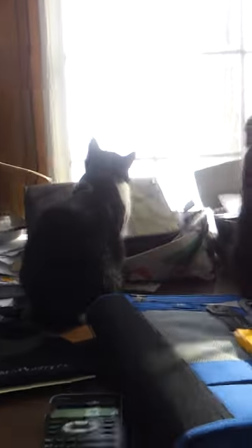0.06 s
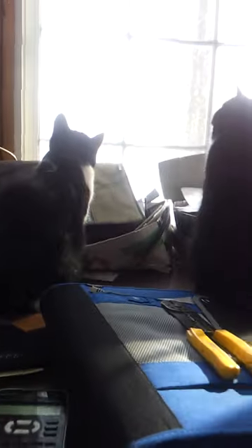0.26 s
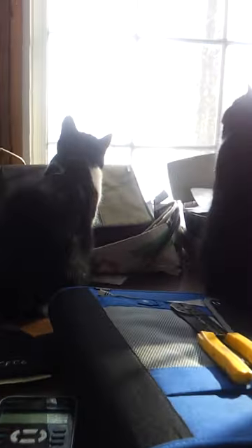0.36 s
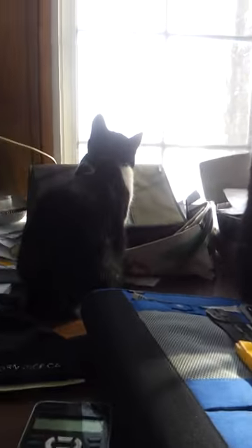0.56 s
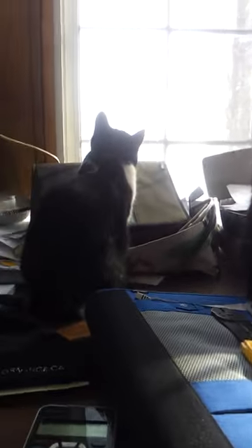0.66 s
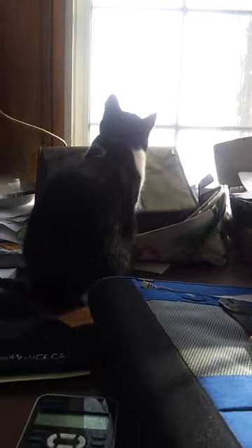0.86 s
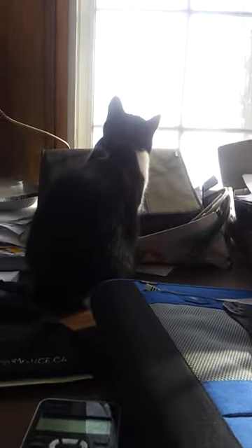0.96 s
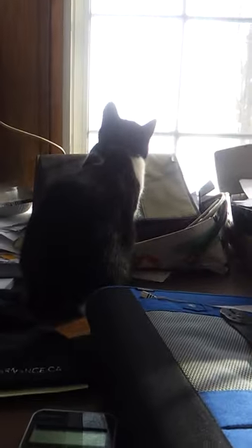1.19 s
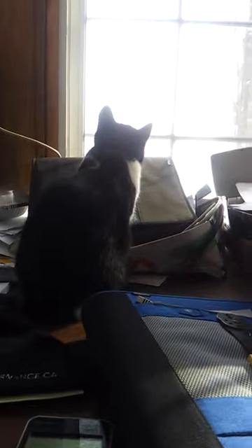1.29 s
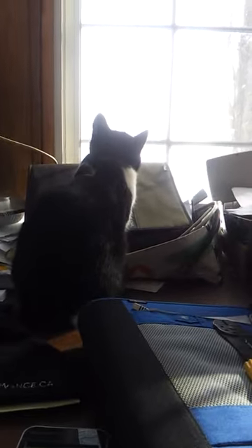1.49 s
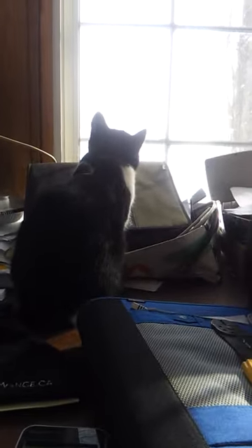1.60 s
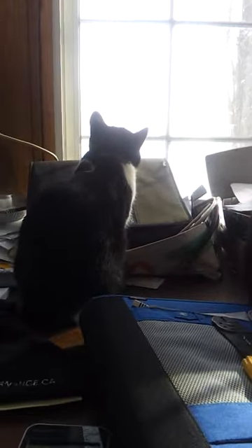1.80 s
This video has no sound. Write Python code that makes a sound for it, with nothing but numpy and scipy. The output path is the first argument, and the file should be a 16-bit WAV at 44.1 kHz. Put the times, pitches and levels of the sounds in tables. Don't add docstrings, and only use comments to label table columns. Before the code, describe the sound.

Very close handling noise early on: small clicks, a dull rising rub, one low bump with a sharp snap, then a quiet room with hiss, a faint tick and a barely audible cloth brush.

```python
import sys
import numpy as np
from scipy import signal
from scipy.fft import rfft, irfft
from scipy.io import wavfile
from scipy.ndimage import uniform_filter1d

SR = 44100
rng = np.random.default_rng(int(sys.argv[2]) if len(sys.argv) > 2 else 0)


def volts_from_decibels(level):
    exponent = np.asarray(level, float) / 20
    return 10 ** exponent


def persist_wave(psi):
    counts = np.round(np.clip(psi, -1, 1) * 32767).astype(np.int16)
    wavfile.write(sys.argv[1], SR, np.atleast_2d(counts).T)


N = 81585


def evened(x):
    return x / np.sqrt(np.mean(x ** 2) + 1e-20)


def read(points, hz):
    f, value = np.transpose(points)
    return np.interp(np.log(hz + 1), np.log(f + 1), value)


def colour(x, points):
    log_gain = np.log(volts_from_decibels(read(points, abs(np.fft.fftfreq(4096, 1 / SR)))))
    minimum_phase = np.exp(np.conj(signal.hilbert(log_gain)))
    taps = np.fft.ifft(minimum_phase).real[:2048]
    return evened(signal.oaconvolve(x, taps)[:len(x)])


def resonate(x, hz, width):
    return signal.lfilter(*signal.iirpeak(hz, hz / width, fs=SR), x)


def resonate_twice(x, hz, width):
    return resonate(resonate(x, hz, width), hz, width)


def knocks(rows, cycles):
    out, t = np.zeros(N), np.arange(N) / SR
    for start, db, hz, direction in rows:
        turns = np.maximum(t - start, 0) * hz
        swing = turns * np.exp(-turns / cycles) * np.sin(2 * np.pi * turns)
        out += direction * volts_from_decibels(db) * swing / abs(swing).max()
    return out


def air_wash():
    patch_db, swell_db = 0.96, 0.34
    frames = N // 256 + 5
    real, imag, patches = rng.standard_normal((frames, 513, 3)).T
    patches = uniform_filter1d(patches, 14, 0)
    patches = evened(uniform_filter1d(patches, 12, 1))
    swell = evened(uniform_filter1d(rng.standard_normal(frames), 10))
    z = (real + 1j * imag) * volts_from_decibels(patch_db * patches + swell_db * swell)
    return evened(signal.istft(z, nperseg=1024, noverlap=768)[1][:N])


def room_air():
    # f/Hz, level/dB per Hz
    air_spectrum = [(25, -8), (140, -4.5), (210, -0.5), (450, -1), (850, -6.5), (1020, -8.5), (2500, -9.5),
                    (6000, -19.5), (15400, -30)]
    # f/Hz, width/Hz, level/dB
    humps = [(771, 460, -76), (1323, 70, -90), (2463, 320, -94.5)]
    wash = air_wash()
    gain = volts_from_decibels(read(air_spectrum, np.fft.rfftfreq(N, 1 / SR)))
    out = volts_from_decibels(-63.5) * evened(irfft(rfft(wash) * gain, N))
    for hz, width, db in humps:
        out += volts_from_decibels(db) * evened(resonate_twice(wash[::-1], hz, width))
    return out


def appliance_tones():
    # f/Hz, level/dB
    hum_lines = [(818.3, -79), (1238, -79.5), (1292, -88), (1335, -84), (2654, -86.5)]
    out, t = np.zeros(N), np.arange(N) / SR
    for hz, db in hum_lines:
        waver = 2.2 * evened(uniform_filter1d(rng.standard_normal(N), 4000))
        out += volts_from_decibels(db + 5) * np.sin(2 * np.pi * hz * t + waver)
    return out


def skin_slips():
    # f/Hz, width/Hz, level/dB
    shell = [(1300, 300, -29), (2140, 250, 4.5), (2840, 220, -3), (5100, 1050, -5)]
    slips_per_s, spread_db, slip_share = 6000, 2.5, 0.55
    size = volts_from_decibels(spread_db * np.minimum(rng.exponential(1, N), 3))
    size = size * (rng.random(N) < slips_per_s / SR)
    jerks = evened(size * rng.choice([1., 1., -1.], N))
    slips = slip_share * jerks + (1 - slip_share) * rng.standard_normal(N)
    return slips + sum(volts_from_decibels(db) * resonate(slips, hz, width) for hz, width, db in shell)


def finger_drag():
    # t/s, level/dB, brightness/0-1
    course = [
        (0.144, -62, 0.),
        (.163, -51.5, 0.02),
        (.198, -48, 0.06),
        (.218, -36, 0.18),
        (0.236, -31, 0.13),
        (0.242, -27.5, 0.19),
        (0.253, -41.5, 0.98),
        (.290, -56, 1),
        (.312, -72, 0.7),
    ]
    # f/Hz, level/dB per Hz
    pressed = [(88, -48.5), (150, -1.5), (471, -1), (1090, -4), (1220, 2), (2140, -8), (2360, -4.5),
               (3620, -10), (15500, -38)]
    # f/Hz, level/dB per Hz
    brushed = [(88, -58), (150, -16), (268, -31), (404, -1.5), (1150, -2.5), (1370, -0.5), (1760, -11.5),
               (3830, -4), (15500, -23.5)]
    start, level_db, bright = np.transpose(course)
    t = np.arange(N) / SR
    slips = skin_slips()
    mix = np.clip(np.interp(t, start, bright), 0, 1)
    rub = np.sqrt(1 - mix) * colour(slips, pressed)
    rub += np.sqrt(mix) * colour(slips[::-1], brushed)
    rub += volts_from_decibels(-8) * (1 - mix) ** 4 * evened(resonate_twice(slips, 430, 510))
    return rub * volts_from_decibels(np.interp(t, start, level_db, left=-120, right=-120))


def body_pushes():
    # t/s, peak level/dB, f/Hz, direction/signed factor
    shoves = [(.1445, -47, 99, -0.86), (.1495, -40.5, 172, 1), (.1520, -45.5, 91, -1.1),
              (.1575, -43.5, 55, 0.91), (.1638, -38, 90, 0.94), (.1835, -43, 169, 1),
              (.1865, -44.5, 347, -1.8), (.2408, -24.5, 190, 1), (.2431, -17, 103.5, -0.74),
              (.2490, -36.5, 28.7, 0.72), (.300, -58, 26.2, -1), (.330, -58.5, 22, 1), (.706, -57, 84, 1)]
    vent = signal.butter(1, 14, "high", fs=SR)
    return signal.lfilter(*vent, knocks(shoves, 0.15))


def skin_ticks():
    # t/s, peak level/dB, f/Hz, direction/signed factor
    snaps = [(.1497, -38.5, 3660, -1.2), (.1577, -38, 3140, -0.91), (.1627, -39.5, 2380, -1.1),
             (.2025, -27.5, 826, 0.84), (.2028, -27, 4000, 1), (.2153, -23.5, 1680, 1),
             (.2334, -30, 1130, 0.63), (.2390, -23, 1300, -1.2), (.2415, -16, 1700, 1),
             (.2422, -16, 1300, 0.88), (.4970, -50, 1730, 1), (.4999, -46.5, 1000, 1)]
    return knocks(snaps, 0.25)


def cloth_rustle():
    # f/Hz, width/Hz, level/dB
    cloth_bands = [(2060, 360, -2), (2680, 250, 0), (4000, 250, 3), (5200, 900, -6)]
    start_s, rise_s, fade_s = 1.828, 0.0071, 0.02
    t = np.maximum(np.arange(N) / SR - start_s, 0)
    roughness_db = 4.3 * evened(uniform_filter1d(rng.standard_normal(N), 60))
    grains = rng.standard_normal(N) * volts_from_decibels(roughness_db)
    body = evened(sum(volts_from_decibels(db) * resonate_twice(grains, hz, width) for hz, width, db in cloth_bands))
    return volts_from_decibels(-60.5) * body * np.minimum(t / rise_s, 1) * np.exp(-(t / fade_s) ** 2)


def scene():
    room = room_air() + appliance_tones()
    handling = finger_drag() + body_pushes() + skin_ticks() + cloth_rustle()
    return (room + handling)[None]


def top_cut(x):
    return signal.sosfilt(signal.butter(12, 15700, fs=SR, output="sos"), x)


def record(dry):
    hiss = signal.lfilter(*signal.butter(1, 1530, "high", fs=SR), rng.standard_normal(dry.shape))
    return top_cut(dry + volts_from_decibels(-69.5) * hiss)


dry = scene()
out = record(dry)
persist_wave(out)
```